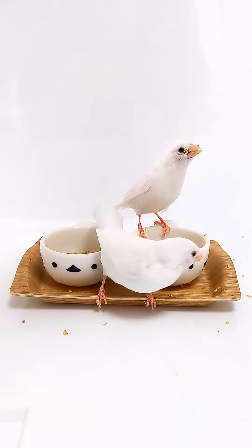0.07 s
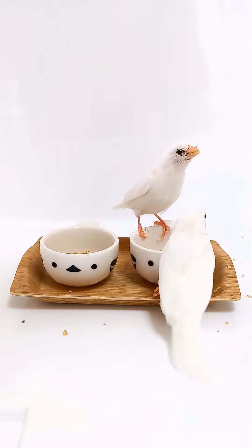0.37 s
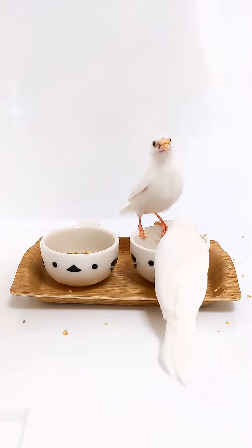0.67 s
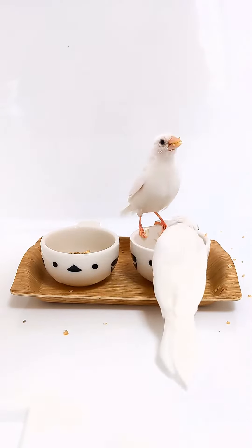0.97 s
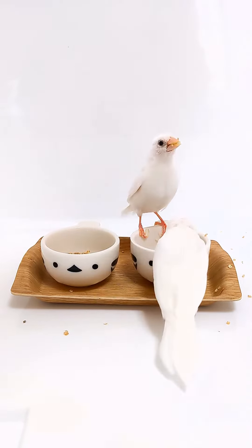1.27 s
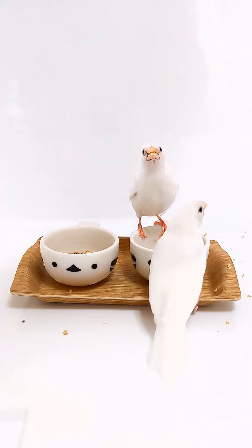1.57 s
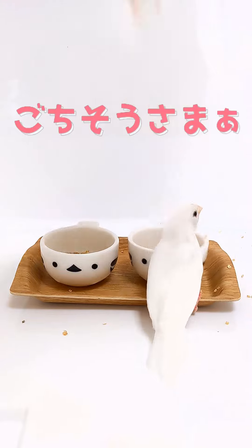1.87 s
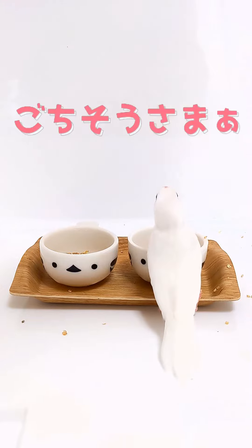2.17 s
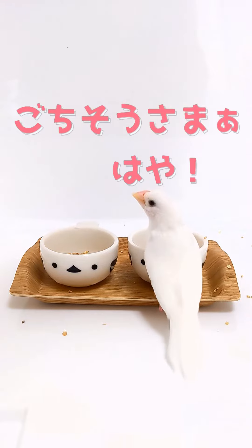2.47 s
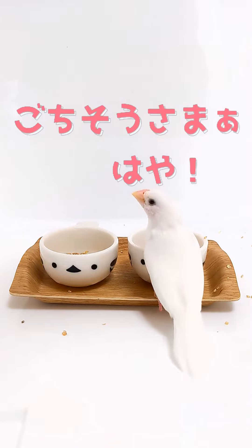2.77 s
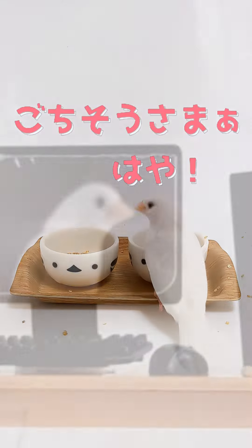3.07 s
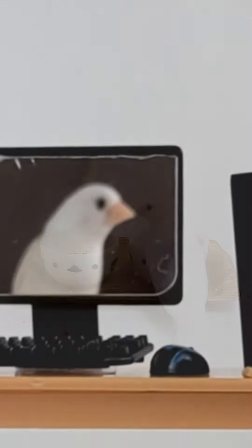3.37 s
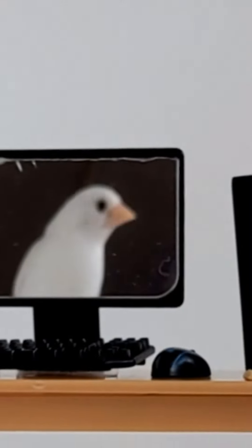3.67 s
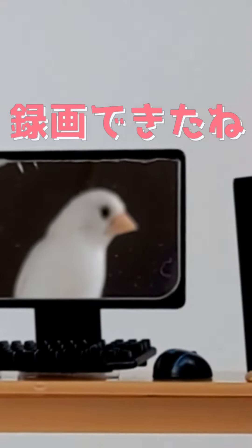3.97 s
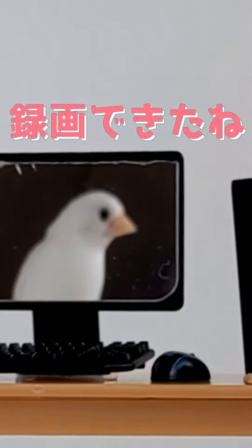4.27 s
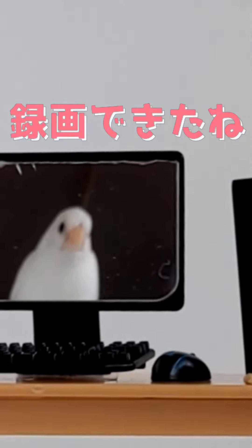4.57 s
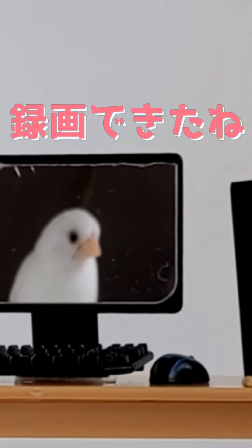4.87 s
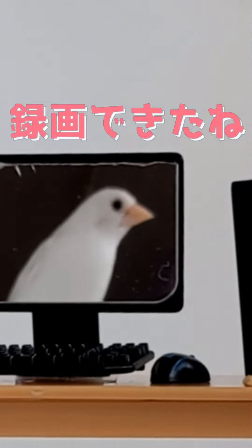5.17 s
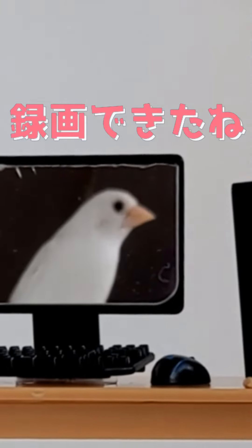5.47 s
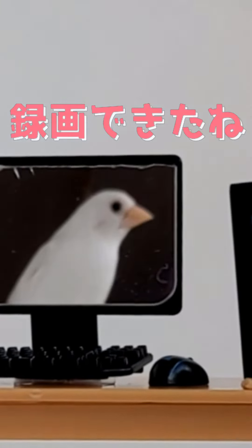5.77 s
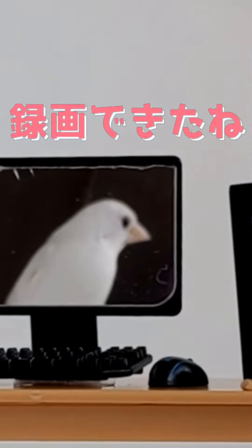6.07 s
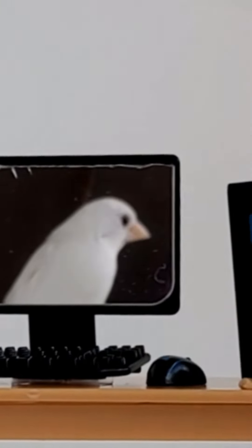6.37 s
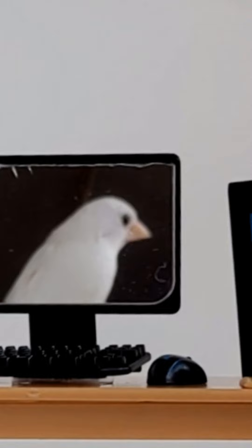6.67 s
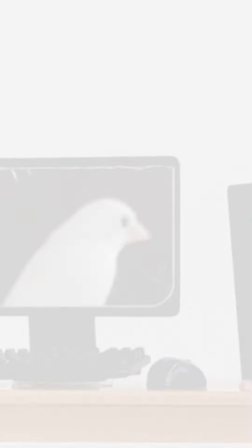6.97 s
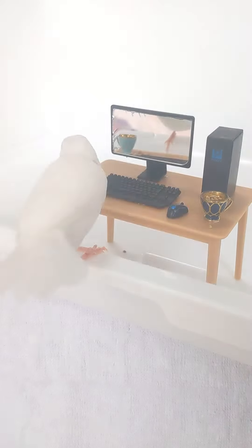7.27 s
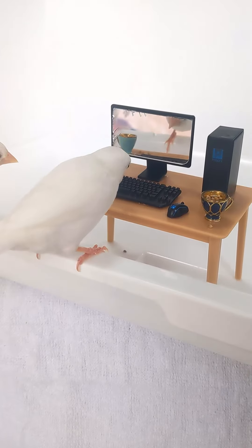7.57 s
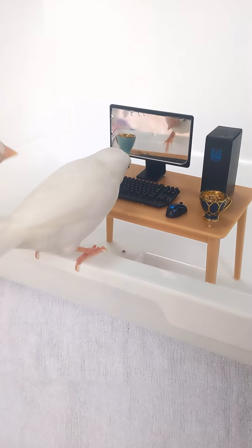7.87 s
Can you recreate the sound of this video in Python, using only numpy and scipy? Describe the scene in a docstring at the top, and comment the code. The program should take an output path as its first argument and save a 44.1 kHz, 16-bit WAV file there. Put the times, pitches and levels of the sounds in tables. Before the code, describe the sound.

Two small finches move about close to the microphone in a quiet room. Claws click on china cups with a slight ring, and a short dry chirp follows. One bird lands on a wooden tray with a loud cluster of knocks while fluttering wings buffet the microphone. After a lull come scattered light taps on a hollow ledge, a sharp beak snap, faint nibbling and another chirp, over a low room rumble.

```python
"""Two small finches at china seed cups on a wooden tray, close to a stereo microphone in a quiet room.
One hops onto a cup, its claws clicking and the china ringing; the other takes off and lands with
a knock, its wings swishing and buffeting the microphone ports. Later a finch steps about on a hollow
ledge and taps with its beak. Short dry chips, pulses of the syrinx ringing in the throat, come
in between, over a low room rumble and faint hums."""
import sys
import numpy as np
from scipy import signal
from scipy.fft import rfft, irfft
from scipy.io import wavfile
from scipy.ndimage import uniform_filter1d

SR = 44100
rng = np.random.default_rng(int(sys.argv[2]) if len(sys.argv) > 2 else 0)


def generate_wav(sig):
    """Save sig (samples, or channels by samples) to the path in sys.argv[1] as 16-bit PCM at SR."""
    pcm = np.round(np.clip(np.atleast_2d(sig).T, -1, 1) * 32767).astype(np.int16)
    wavfile.write(sys.argv[1], SR, pcm)


N = 354078
TIME = np.arange(N) / SR
AGE = np.arange(SR // 3) / SR  # seconds into one short sound
HZ = np.fft.rfftfreq(4096, 1 / SR)  # grid for filter curves

# Feet on the cups and tray; pan is always left minus right:
# start_s, claw_peak_db, tray_peak_db, pan_db, claw_tilt_db_per_octave
FOOTFALLS = [(0.211, -31, -44, -9, 7), (0.2641, -24, -30, -6, 7.5), (.280, -24, -30, -10, -3.5),
             (.316, -17.5, -43, -10, 3), (.478, -36.5, -50, -10, -1), (.497, -26, -36, -7.5, -7),
             (.512, -21.5, -27, -7.5, 3.5), (0.538, -33, -59, -6, 9), (1.598, -34, -38.5, -6.5, -2.5),
             (1.8897, -17, -6.5, -7.5, -6), (1.9361, -33, -18.5, -8, -7), (1.9714, -32.5, -17.5, -9, -10),
             (1.9784, -45, -18, -3.5, 7)]
# Steps and pecks on the hollow ledge: start_s, peak_db, pan_db, tilt_db_per_octave
LEDGE_KNOCKS = [(4.9216, -26.5, -1, -2.5), (5.017, -39, -7, 0.5), (5.1477, -33, -11, 6.5),
                (7.1748, -31.5, -4, -2.5), (7.5338, -39.5, -1.5, 1.5), (7.5617, -29.5, -2.5, -0.5)]
# Bursts of flapping: start_s, length_s, beat_hz, swish_relative_db, draught_relative_db, draught_pan_db
FLIGHTS = [(1.822, 0.28, 27, -38.5, -14.5, -3), (2.194, 0.17, 29.3, -46.5, -17, -11),
           (2.499, 0.14, 32.5, -52, -33.5, 3), (2.676, 0.17, 29.5, -51, -27, 9.5)]
FIRST_BEAT_S = 0.012  # from the start of a burst to its first downstroke


def gain_of(db):
    """Decibels to amplitude."""
    return 10 ** (np.asarray(db) / 20)


def unit_rms(x):
    """Scales to rms 1."""
    return x / np.sqrt(np.mean(x ** 2) + 1e-20)


def flutter(count, size):
    """Random unevenness of rms 1, smoothed over size samples."""
    return unit_rms(uniform_filter1d(rng.standard_normal(count), size=size))


def curve(points, hz=HZ):
    """Interpolates a table on a log-frequency axis."""
    points_hz, values = np.transpose(points)
    return np.interp(np.log(hz + 1), np.log(points_hz + 1), values)


def add(mix, start_s, sound):
    """Mixes in a stereo sound."""
    part = mix[:, round(start_s * SR):][:, :sound.shape[1]]
    part += sound[:, :part.shape[1]]


def colour(x, db):
    """Minimum-phase filter with the gain db on the grid HZ."""
    mirrored_db = np.r_[db, db[-2:0:-1]]
    log_gain = np.log(gain_of(np.maximum(mirrored_db, -100)))
    taps = np.fft.ifft(np.exp(signal.hilbert(log_gain).conj())).real
    return signal.oaconvolve(x, taps[None], axes=1)[:, :x.shape[1]]


def slope(tilt, top_hz=SR):
    """A tilt in dB per octave, flat in the bass and above top_hz."""
    return tilt * np.log2(np.clip(HZ, 400, top_hz) / 1000)


def sides(pan_db):
    """Left and right gains of mean 1."""
    left = np.atleast_1d(gain_of(pan_db))
    return 2 * np.array([left, np.ones_like(left)]) / (1 + left)


def placed(pair, db, pan_db):
    """Pans a short sound and sets the level of its loudest 2.5 ms."""
    pair = pair * sides(pan_db)
    peak_power = uniform_filter1d(pair.mean(0) ** 2, size=110).max()
    return gain_of(db) * pair / np.sqrt(peak_power)


def air(spectrum, rms_db):
    """Steady room noise: the rumble is common to both microphone ports, the hiss much less so."""
    # Likeness of the two ports: frequency_hz, correlation
    likeness = [(60, 0.95), (130, 0.99), (290, 0.58), (640, 0.13), (1410, -0.052), (3100, -0.23),
                (6820, 0.79), (15000, 0.23)]
    # Lean of the noise to one side: frequency_hz, pan_db
    balance = [(100, 0.5), (380, 1.5), (1300, -1), (4400, -2.5), (15000, -10)]
    left, other = rfft(rng.standard_normal((2, N)))
    hz = np.fft.rfftfreq(N, 1 / SR)
    shared = np.clip(curve(likeness, hz), -1, 1)
    right = shared * left + np.sqrt(1 - shared ** 2) * other
    pair = irfft(np.array([left, right]) * gain_of(curve(spectrum, hz)) * sides(curve(balance, hz)), N)
    return gain_of(rms_db) * pair / pair.mean(0).std()


def room_tone():
    """The room noise changes from place to place: beside the cups, at the ledge, behind the ledge."""
    # Noise spectrum at each place: frequency_hz, relative_db
    cups_air = [(15, -48), (25, -28), (36, -22.5), (55, 1.5), (130, -9), (166, -7), (335, -21.5),
                (531, -29), (659, -24), (714, -31), (1070, -30), (2410, -34), (4740, -39), (6050, -37),
                (16000, -48.5)]
    ledge_air = [(15, -49), (25, -49), (37, -14.5), (59, 3.5), (87, -10), (166, -6), (185, -16.5),
                 (242, -10), (277, -19), (354, -16), (416, -23), (545, -19), (1100, -27), (6380, -33),
                 (16000, -42.5)]
    behind_air = [(15, -40), (25, -34), (41, -10.5), (70, 2.5), (117, -8.5), (344, -13.5), (439, -20),
                  (695, -21.5), (1260, -28.5), (3160, -36), (3430, -39), (4490, -39), (5880, -42),
                  (8590, -42.5), (16000, -50)]
    at_ledge = np.interp(TIME, [2.9, 3.4], [0, 1])
    behind = np.interp(TIME, [7.03, 7.05], [0, 1])
    return (np.sqrt(1 - at_ledge) * air(cups_air, rms_db=-45.5)
            + np.sqrt(at_ledge * (1 - behind)) * air(ledge_air, rms_db=-50)
            + np.sqrt(behind) * air(behind_air, rms_db=-42.5))


def hums(waver=0.4, fade_s=0.0087):
    """Thin tones in the room noise that waver in strength."""
    # Faint hums: start_s, end_s, pitch_hz, rms_db
    tones = [(0, 3.1, 161.5, -62), (7.04, 9.4, 258.7, -58.5), (7.04, 8.1, 345, -57), (7.04, 8.1, 3200, -82),
             (7.04, 8.1, 4700, -78.5)]
    out = np.zeros(N)
    for start, end, hz, db in tones:
        strength = 1 + waver * np.interp(TIME, np.linspace(0, TIME[-1], 60), rng.standard_normal(60))
        gate = np.clip(np.minimum(TIME - start, end - TIME) / fade_s, 0, 1)
        out += gain_of(db) * np.sqrt(2) * strength * gate * np.sin(2 * np.pi * hz * TIME)
    return out


def throat(drive, centre_hz, width_hz=420):
    """The bird's throat: one resonance with a moving centre."""
    carrier = np.exp(2j * np.pi * np.cumsum(centre_hz) / SR)
    pole = np.exp(-np.pi * width_hz / SR)
    return (carrier * signal.lfilter([1 - pole], [1, -pole], drive / carrier + 1e-18)).real


def chips(arch=0.1055, jitter=0.081, rough=0.27, rasp=0.4):
    """Uneven syrinx pulses ring the throat, which glides up as the beak opens and down as it closes."""
    # Calls: start_s, length_s, rms_db, pan_db, throat_hz, glide_octaves
    calls = [(.12, 0.024, -34, -7.5, 2580, 0.44), (.166, 0.022, -34.5, -12, 3380, -0.66),
             (1.43, 0.019, -26, -42, 3280, 0.1), (1.454, 0.033, -36, -32, 3550, -.2),
             (2.917, 0.038, -51.5, -11, 3000, -.4), (2.945, 0.038, -52.5, -13, 3000, .4),
             (3.816, 0.061, -56, -9.5, 2460, .05), (4.82, 0.04, -58.5, -5, 2400, 0),
             (5.814, 0.078, -58, -12, 2430, -.05), (6.87, 0.019, -32.5, -15, 3050, .6),
             (6.882, 0.0176, -35.5, -20, 3800, -0.2)]
    # Raspy skirt around the throat resonance: frequency_hz, gain_db
    skirt_colour = [(300, -71), (650, 7.5), (900, -2), (1300, 2.5), (2500, -5.5), (4500, -1), (6500, -4.5),
                    (9000, -11), (16000, 4)]
    band = signal.butter(2, [650, 7800], "bandpass", fs=SR, output="sos")
    effort_db = [-51.5, -40.5]  # from soft to loud, pitch rises and sound gathers in the throat
    out = np.zeros((2, N))
    for start, length, db, pan_db, throat_hz, glide in calls:
        pitch_hz = np.interp(db, effort_db, [564, 937])
        skirt_db = np.interp(db, effort_db, [17, -0.5])
        progress = np.clip(AGE / length, 0, 1)
        swell = np.sin(np.pi * progress)
        bend = 1 + arch * (swell - 1) + jitter * flutter(len(AGE), size=40)
        cycles = np.cumsum(pitch_hz * bend) / SR
        pulses = unit_rms(sum(np.cos(2 * np.pi * k * cycles) for k in range(1, 15)))
        hiss = rng.standard_normal(len(AGE))
        drive = ((1 - rough) * pulses + rough * hiss) * swell
        ring = throat(drive, throat_hz * 2 ** (glide * (progress - 0.5)))
        skirt = colour((drive + rasp * hiss * swell)[None], curve(skirt_colour))[0]
        voice = signal.sosfilt(band, unit_rms(ring) + gain_of(skirt_db) * unit_rms(skirt))
        pair = np.array([np.roll(voice, shift=2), voice]) * sides(pan_db)
        rms = np.sqrt(np.sum(pair.mean(0) ** 2) / (length * SR))
        add(out, start, gain_of(db) * pair / rms)
    return out


def rustle(db, pan_db, decay_s, tilt, grain_db=4.5):
    """Grainy noise that swells and dies away; a short rustle also swells quickly."""
    # Spectrum of the rustle: frequency_hz, gain_db
    rustle_colour = [(300, -4.5), (1100, -6.5), (2000, -2.5), (4000, -0.5), (7000, -2.5), (10500, -8.5),
                     (13500, -10), (16000, -11.5)]
    rise_s = min(0.63 * decay_s, 0.016)
    envelope = np.minimum(AGE / rise_s, np.exp((rise_s - AGE) / decay_s))
    grain = gain_of(grain_db * flutter(len(AGE), size=60))
    noise = rng.standard_normal((2, len(AGE))) * envelope * grain
    return placed(colour(noise, curve(rustle_colour) + slope(tilt)), db, pan_db)


def rustles():
    """Brief grainy rustles, and a faint hiss swelling just before the first wing burst."""
    # Swells of grainy noise: start_s, peak_db, pan_db, decay_s, tilt_db_per_octave
    swells = [(.175, -40.5, -7, 0.2, 0), (.325, -27.5, -8, .018, 1.5), (1.405, -42, -1, 0.059, 1),
              (1.522, -47, -8, 0.033, -1), (1.756, -53, -11, 0.085, 4.5), (2.077, -43, -7, .012, -2),
              (2.831, -43, 1, 0.018, 3.5), (4.483, -48.5, -10, 0.02, 8.5), (4.916, -34, -23, 0.005, -0.5),
              (5.074, -53.5, -6.5, 0.095, 3), (6.815, -49, -6.5, 0.12, -4), (7.126, -50.5, 2, 0.05, 7),
              (7.469, -51, -1, 0.21, 0)]
    out = np.zeros((2, N))
    for start, *swell in swells:
        add(out, start, rustle(*swell))
    return out


def click(db, pan_db, decay_s, tilt, rise_s=0.0005, catch_db=4):
    """A hard tip skids for a few milliseconds, catching in tiny jolts, different at each port."""
    # Bright spectrum of the skid: frequency_hz, gain_db
    skid_colour = [(300, -35), (1100, -25.5), (2300, -5.5), (4000, 3.5), (5500, -1.5), (7000, 0.5),
                   (10500, -8), (13500, -3), (16000, -13)]
    jolts = gain_of(catch_db * flutter(len(AGE), size=12))
    envelope = (1 - np.exp(-AGE / rise_s)) * np.exp(-AGE / decay_s)
    skid = rng.standard_normal((2, len(AGE))) * jolts * envelope
    return placed(colour(skid, curve(skid_colour) + slope(tilt)), db, pan_db)


def claws(decay_s=0.0029, scuff_lag_s=0.005):
    """A claw clicks, then the toes scuff to rest; on the ledge there is only a faint tick."""
    out = np.zeros((2, N))
    for start, db, _, pan_db, tilt in FOOTFALLS:
        add(out, start, click(db, pan_db - 3, decay_s, tilt))  # nearer the right port than the tray is
        add(out, start + scuff_lag_s, rustle(db - 17, pan_db, decay_s=0.026, tilt=0.32 * tilt))
    for start, db, pan_db, _ in LEDGE_KNOCKS:
        add(out, start, click(db - 15, pan_db, decay_s, tilt=1))
    return out


def knocks(blows, modes, contact_db, contact_s, left_lag_s):
    """Each blow is a rough contact and the ringing modes of the struck surface."""
    # Spectrum of the contact: frequency_hz, gain_db
    contact_colour = [(150, 4), (500, 1), (1100, 1.5), (1900, -3), (3200, -11), (6000, -29), (10000, -35),
                      (16000, -35)]
    age = np.maximum(AGE - np.array([[left_lag_s], [0]]), 0)  # the left port is farther away
    out = np.zeros((2, N))
    for start, db, pan_db, tilt in blows:
        weights = rng.uniform(0.7, 1.3, (len(modes), 2, 1))
        ring = sum((-1) ** k * weights[k] * gain_of(mode_db - 60 * age / t60)
                   * np.sin(2 * np.pi * hz * age) for k, (hz, mode_db, t60) in enumerate(modes))
        noise = unit_rms(colour(rng.standard_normal(age.shape), curve(contact_colour)))
        contact = gain_of(contact_db) * noise * np.exp(-AGE / contact_s)
        blow = colour(ring + contact, slope(tilt, top_hz=2056))
        add(out, start, placed(blow, db, pan_db))
    return out


def tray_knocks(weight_lag_s=0.00157, tilt=-3):
    """Just after the claw touches, the bird's weight knocks the wooden tray."""
    # Modes of the tray: pitch_hz, level_db, t60_s
    modes = [(373, -15, 0.05), (505, -7.5, 0.072), (623.4, -9.5, 0.06), (847, -9, 0.076),
             (908, -7.5, 0.073), (1085.5, -0.5, 0.06), (1385, -14.5, 0.0718), (1490, -11, 0.016),
             (1778, -13.5, 0.06), (2060, -13, 0.0515), (2833, -10, .03), (3250, -3, 0.02),
             (3400, -17, 0.08), (4980, -7.5, 0.044)]
    landings = [(start + weight_lag_s, db, pan_db, tilt) for start, _, db, pan_db, _ in FOOTFALLS]
    return knocks(landings, modes, contact_db=2.5, contact_s=0.0049, left_lag_s=0.000055)


def cups(touch, ring_db=-45, until_s=2.9, crossfeed=0.29):
    """Clicks, rustles and calls set the china cups ringing while the birds are on them."""
    # Modes of the cups: pitch_hz, relative_db, t60_s
    modes = [(559.5, 6.5, 0.084), (1110, 8.5, 0.11), (1160, 5.5, 0.095), (1560, 10.5, 0.044),
             (2930, -5.5, .04), (4492, 7, 0.023), (6934, 3, 0.057), (8880, 6.5, 0.041),
             (12570, -4.5, 0.0273)]
    ring = sum(gain_of(db - 60 * AGE / t60) * np.sin(2 * np.pi * hz * AGE) for hz, db, t60 in modes)
    touch = (touch + crossfeed * touch[::-1]) * (TIME < until_s)
    return gain_of(ring_db) * signal.oaconvolve(touch, ring[None], axes=1)[:, :N]


def beak(nibbles=9, nibbles_per_s=15, nibble_from_s=5.98, fade_db_per_s=7):
    """The beak snaps shut; after the loudest snap it nibbles on unevenly, ever more softly."""
    # Dry snaps: start_s, peak_db, pan_db
    snaps = [(1.514, -42.5, -14), (1.5696, -30, -11), (3.2437, -52, -11), (5.008, -36.5, -15),
             (5.7501, -41, -20.5), (5.861, -40.5, -19.5), (5.9148, -20.5, -26.5)]
    out = np.zeros((2, N))
    for start, db, pan_db in snaps:
        add(out, start, click(db, pan_db, decay_s=0.0014, tilt=3))
    gaps = rng.uniform(0.5, 1.5, nibbles) / nibbles_per_s
    for age in np.cumsum(gaps) - gaps[0]:
        nibble = click(db=-54.5 - fade_db_per_s * age, pan_db=-15, decay_s=0.007, tilt=5)
        add(out, nibble_from_s + age, nibble)
    return out


def flapping(start, length, beat_hz, pass_share=0.47):
    """Time into a burst, time since the bird passed closest, and the wing cycle (+1 on a downstroke)."""
    age = TIME - start
    return age, age - pass_share * length, np.cos(2 * np.pi * beat_hz * (age - FIRST_BEAT_S))


def wings(swish_db=5, beat_db=2, grain_db=2, attack_db_per_s=1500, release_db_per_s=231):
    """Feathers swish through each burst, loudest nearest the microphone, throbbing with the beat."""
    # Spectrum of the swish: frequency_hz, gain_db
    swish_colour = [(300, 4.5), (700, 2.5), (1500, -2.5), (2100, 2.5), (3000, -2.5), (5000, -3), (7200, 0),
                    (10500, -3), (14000, -3), (16000, -10.5)]
    strength = np.zeros((2, N))
    for start, length, beat_hz, db, _, pan_db in FLIGHTS:
        age, since_pass, beat = flapping(start, length, beat_hz)
        attack_db = attack_db_per_s * np.maximum(FIRST_BEAT_S / 2 - age, 0)
        release_db = release_db_per_s * np.maximum(age - length, 0)
        away_db = 5.5 * (np.minimum(abs(since_pass), length / 2) / 0.091) ** 2
        pan = sides(-3 + 0.083 * pan_db)  # follows the draught's side only a little
        strength += gain_of(db - attack_db - release_db - away_db + beat_db * beat) * pan
    grain = flutter(N, size=100)
    swish = unit_rms(colour(rng.standard_normal((2, N)), curve(swish_colour)))
    return swish * strength * gain_of(swish_db + grain_db * grain)


def draught(flow_db=-2, unshared_db=-9, beat_db=2, arch_db=15, rise_s=0.019, low_cut_hz=42):
    """Air thrown by the wings rumbles on the ports; a direct stroke is a push followed by suction."""
    # Spectrum of the eddies: frequency_hz, gain_db
    eddy_colour = [(20, -30), (42, -19), (58, -0.5), (75, -3.5), (110, -14), (145, -13), (220, -20),
                   (400, -32.5), (800, -53.5), (2000, -54), (6000, -83)]
    # Wing strokes that hit a port: centre_s, right_level_db, pan_db, half_width_s
    puffs = [(1.9603, -7.5, -5, 0.004), (2.2541, -0.5, -28, 0.0022), (2.2871, -0.5, -25, 0.0043)]
    noise = rng.standard_normal(N) + gain_of(unshared_db) * rng.standard_normal((2, N))
    eddies = colour(noise, curve(eddy_colour))
    eddies /= np.sqrt(uniform_filter1d(eddies ** 2, size=1800, axis=1) + 1e-12)  # an even flow
    out = np.zeros((2, N))
    for start, length, beat_hz, _, db, pan_db in FLIGHTS:
        age, since_pass, beat = flapping(start, length, beat_hz)
        gust = gain_of(-arch_db * (2 * since_pass / length) ** 2) * np.clip(age / rise_s, 0, 1)
        wake = gain_of(-7.5 - 100 * abs(since_pass)) * (since_pass > 0)  # stirred air lingers
        out += eddies * np.maximum(gust, wake) * gain_of(flow_db + db + beat_db * beat) * sides(pan_db)
    for centre_s, db, pan_db, half_width_s in puffs:
        offset = (TIME - centre_s) / half_width_s
        push_pull = -np.tanh(offset / 0.21) * np.exp(-offset ** 2)
        out += gain_of([[db + pan_db], [db]]) * push_pull
    hz = np.fft.rfftfreq(N, 1 / SR)
    return irfft(rfft(out) / (1 + (low_cut_hz / (hz + 1)) ** 10), N)  # the microphone passes no deep bass


def ledge_knocks():
    """Steps and pecks sound the hollow ledge."""
    # Modes of the ledge: pitch_hz, level_db, t60_s
    modes = [(322, -14, 0.24), (469, -5.5, 0.073), (586, -7.5, 0.088), (777, 3, 0.052), (903, 2.5, 0.042),
             (1100, -1, 0.061), (1460, 0.5, 0.055), (1760, -9.5, 0.021), (2340, 3.5, 0.0049)]
    return knocks(LEDGE_KNOCKS, modes, contact_db=8.5, contact_s=0.0035, left_lag_s=0.00024)


def squeak(start_s=6.817, length_s=0.019, top_hz=13700, fall_hz_per_s=55000, db=-50):
    """A thin falling whistle leads into the last call."""
    out = np.zeros((2, N))
    age = AGE[AGE < length_s]
    tone = np.sin(2 * np.pi * np.cumsum(top_hz - fall_hz_per_s * age) / SR)
    swell = np.sin(np.pi * age / length_s) ** 2
    add(out, start_s, gain_of(db) * swell * tone * sides(pan_db=-12))
    return out


def nearby(x):
    """Close surfaces comb the sound; the left port faces away and loses treble."""
    # First reflections from the table and nearby things: delay_s, level_db
    bounces = [(.0013, -33.5), (.0031, -25), (.0058, -19)]
    x = x + sum(gain_of(db) * np.roll(x, round(delay * SR), axis=1) for delay, db in bounces)
    shade_db = curve([(400, 1.35), (2000, 1.6), (14000, -3)])
    return np.array([colour(x[:1], shade_db)[0], x[1]])


def room(x, gap_s=0.0071):
    """Scattered reflections of a small room, the bass lingering longest."""
    # Reverberation time: frequency_hz, t60_s
    decay_times = [(150, 0.37), (1000, 0.16), (4000, 0.21), (14000, 0.13)]
    scatter = rng.standard_normal((2, len(AGE))) * (AGE > gap_s)
    hz, age, bands = signal.stft(scatter, SR, nperseg=256)
    decay = gain_of(-60 * age / curve(decay_times, hz)[:, None])
    tail = signal.istft(bands * decay, SR, nperseg=256)[1]
    return signal.fftconvolve(x.mean(0)[None], tail / np.linalg.norm(tail[0]), axes=1)[:, :N]


def scene():
    """The finches close to the microphone, their faint reverberation, and the room tone behind."""
    patter = claws() + beak() + rustles()
    calls = chips() + squeak()
    tray, ledge = tray_knocks(), ledge_knocks()
    reverb = room(gain_of(-12.5) * patter + gain_of(-9) * calls
                  + gain_of(-9.5) * tray + gain_of(-7.5) * ledge)
    direct = nearby(patter + calls + tray + ledge + wings())
    china = cups(patter + gain_of(-27) * calls)
    return direct + china + reverb + draught() + room_tone() + hums()


def record(dry, edge_hz=16100):
    """Peaks beyond full scale overload; then the top treble is cut off."""
    low_pass = signal.firwin(401, edge_hz, window=("kaiser", 9), fs=SR)
    return signal.oaconvolve(np.clip(dry, -1, 1), low_pass[None], "same")


dry = scene()
out = record(dry)
generate_wav(out)
```